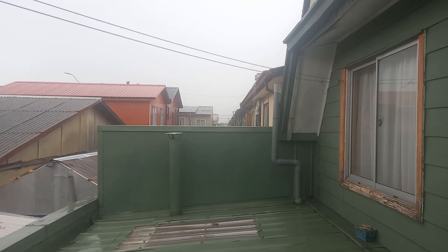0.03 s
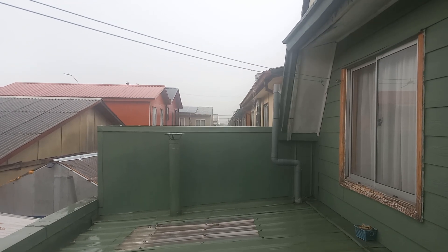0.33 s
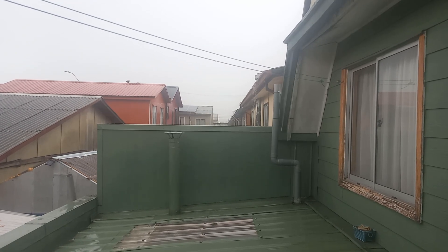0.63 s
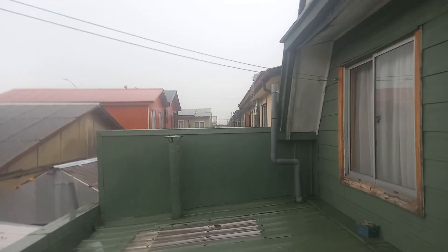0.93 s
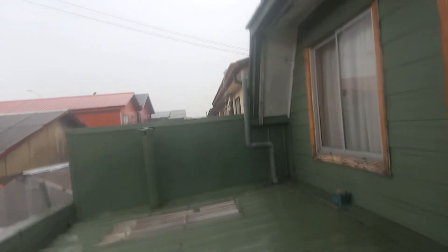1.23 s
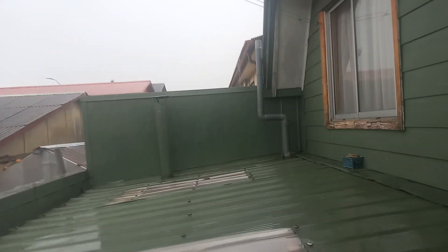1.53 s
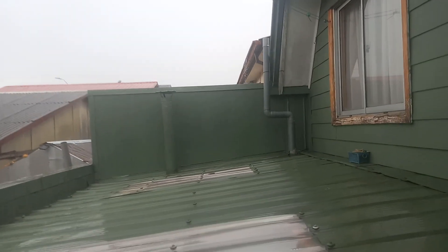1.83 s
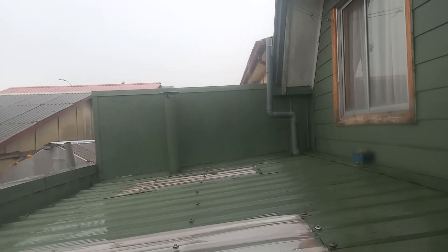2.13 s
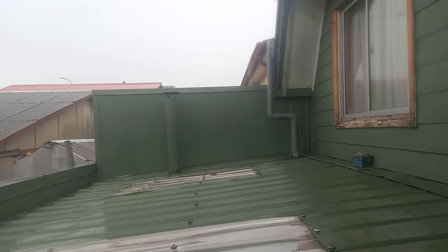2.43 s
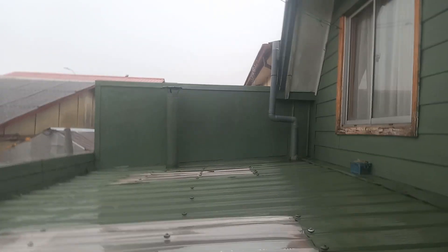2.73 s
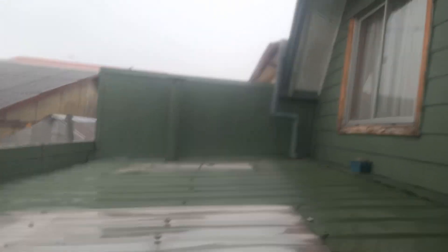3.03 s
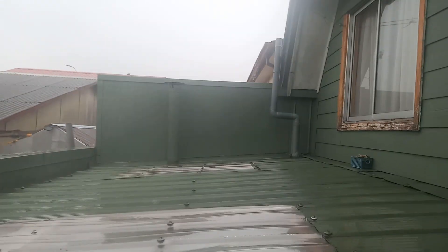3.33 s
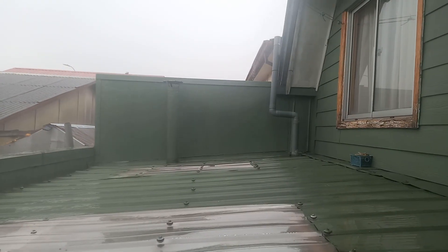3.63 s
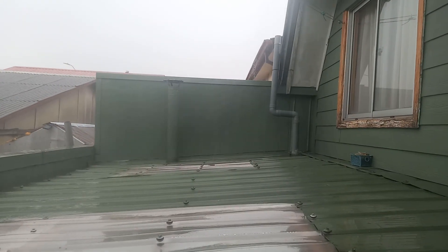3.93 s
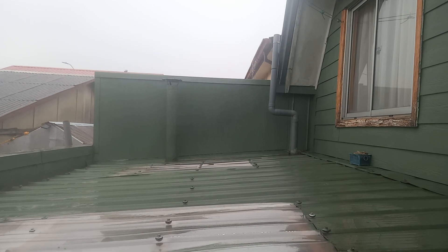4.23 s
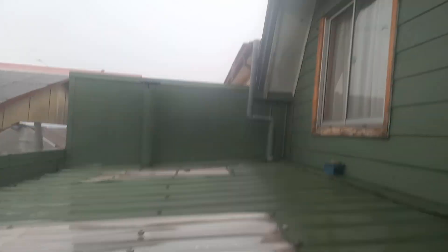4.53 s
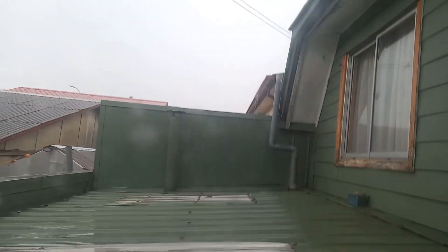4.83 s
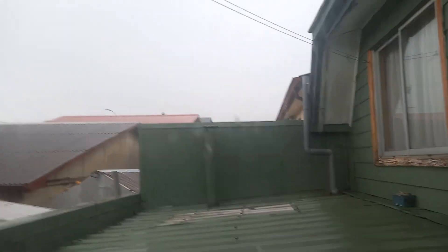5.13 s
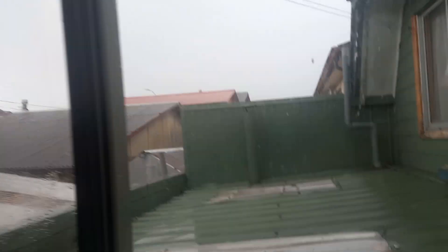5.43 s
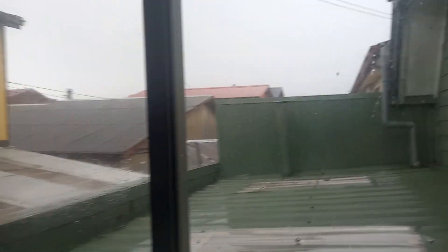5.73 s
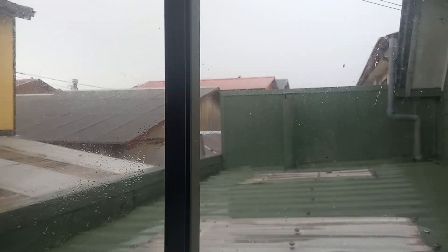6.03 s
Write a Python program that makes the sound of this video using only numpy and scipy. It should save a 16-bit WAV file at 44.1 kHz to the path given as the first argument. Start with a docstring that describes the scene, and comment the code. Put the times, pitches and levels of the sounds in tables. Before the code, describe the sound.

Fingers bump, rub and tick on a handheld microphone over faint rain on sheet-metal roofs, which turns muffled near the end.

```python
"""Rain on metal roofs

Soft, steady rain drums and splashes on sheet-metal roofs, heard from a window by a handheld camera.
Fingers shift their grip: they knock on the case, make it creak and tick, and rub past the two
microphone openings (the ports). A sleeve brushes by. Near the end the camera draws back behind
the window pane, which shuts out much of the bright splash."""
import sys
import numpy as np
from scipy import signal
from scipy.fft import rfft, irfft, next_fast_len
from scipy.io import wavfile

SR = 44100
rng = np.random.default_rng(int(sys.argv[2]) if len(sys.argv) > 2 else 0)


def log_audio(samples):
    """Write samples as a 16-bit WAV file to the path given in sys.argv[1]."""
    # one column per channel
    frames = np.atleast_2d(samples).T
    # limit to full scale, then quantise
    limited = np.clip(frames, -1, 1)
    pcm = np.round(limited * 32767).astype(np.int16)
    wavfile.write(sys.argv[1], SR, pcm)


N = 276507
TIME = np.arange(N) / SR
AGE = TIME[:SR // 4]   # seconds since a touch

# How hard it rains. Each row: time in seconds, level in dB, extra roof drumming in dB.
RAIN_LEVELS = [(0, -57.7, -5), (0.5, -55.3, -2), (0.9, -52, -0.5), (1.5, -54, 3), (1.9, -53.5, -3),
               (2.15, -59.5, 1.5), (2.45, -58, 3.5), (2.8, -52, 1.5), (3.45, -54.5, 2), (4.55, -54.5, 3.8)]
# The tone of the rain. Each row: frequency in Hz, level in dB.
RAIN_TONE = [(50, -7), (82, 1), (125, 0), (175, -10.5), (280, -6), (400, -4.5), (640, -6), (1050, -10),
             (1700, 0), (2300, -2.5), (3000, -17), (4000, -17), (5000, -20), (6200, -17)]
# How the glass weakens the splash. Each row: change in dB, first left, then right.
PANE_SPLASH_DB = [
    [-13],
    [-17.5],
]


def rain():
    """Far drops blur into a wash; near ones add fine grain. The pane dims the treble first and most."""
    level_db, extra_drum_db = in_time(RAIN_LEVELS)
    retreat_start_s, retreat_takes_s = 4.64, 0.82
    retreat = (TIME - retreat_start_s) / retreat_takes_s
    behind_pane = np.clip(retreat, 0, 1)
    drum_db = level_db + extra_drum_db - 13 * behind_pane
    patter_db = level_db - 9.4 * behind_pane
    splash_db = level_db + PANE_SPLASH_DB * np.clip(retreat + 0.21, 0, 1)
    drops = rng.standard_normal((2, N)) + from_db(-3) * grains(per_s=2900, spread_db=2.0)
    wash = with_tone(drops, RAIN_TONE)
    boom = rms_one(cut(wash, 200, "low", order=4)) * from_db(-58.5 + 0.33 * (drum_db + 50))
    drum = rms_one(cut(wash, [200, 950], "band", order=4)) * from_db(drum_db - 1.27)
    patter = rms_one(cut(wash, [950, 2500], "band", order=5)) * from_db(patter_db + 0.84)
    treble = cut(cut(wash, 2690, "high", order=5), 6440, "low", order=18)
    splash = rms_one(treble) * from_db(splash_db - 1.3)
    # the wall beside the window throws the rain back from the right
    return (boom + drum + patter + splash) * from_db([[-1.8], [1.4]])


# Fingers landing on the case. Each row: start in seconds, knock level in dB, pitch in Hz,
# crack level in dB, side in dB (above zero is left, below zero is right).
FINGER_KNOCKS = [(0.3105, -25, 6000, -35, -20), (0.5056, -19, 570, -36, -26),
                 (0.8517, -10.5, 5440, -21, -20), (1.1006, -1.5, 473, -9, -11), (1.1025, 6, 147, -18, -36),
                 (1.179, -6, 378, -12, -15), (1.1828, -2.5, 980, -7.5, -29), (1.1936, 8, 440, -5, 38),
                 (1.2059, -2, 4500, -4, 4), (1.2326, -4, 600, -15, 30), (1.3235, 4.5, 434, -15, 40),
                 (1.381, -11, 320, -26, 26), (1.398, -9, 656, -17, 37), (1.426, -9.5, 350, -22, 26),
                 (1.4588, 6, 408, -12.5, 21), (1.57, -6, 500, -15.5, 13), (1.842, -16, 192, -34, -2),
                 (3.0303, -8, 730, -25, -15), (3.1006, 10.5, 500, -3, 13), (4.4219, -13.5, 317, -19, -21),
                 (4.461, -7.5, 480, -15, -29), (4.5086, -6, 387, -40, -32), (4.5292, -0.5, 347, -25, -38),
                 (5.7469, -19.5, 323, -38, 24), (6.033, -40, 1170, -31, 22)]
# The low notes of the case. Each row: pitch in Hz, level in dB, seconds to fade by 60 dB.
CASE_NOTES = [(81, -3.5, 0.15), (121.8, -4.5, 0.072), (211, -10, 0.051), (297, -9.5, 0.042)]


def knocks():
    """A fingertip lands near one port: a push of air, a hollow knock, a crack and a low thump."""
    out = np.zeros((2, N))
    for start, knock_db, hz, crack_db, left_db in FINGER_KNOCKS:
        # soft flesh rounds off the push
        press = cut(air_push(hz, cycles=2.28), min(4.07 * hz, 14000), "low", order=3)
        hollow = cut(rng.standard_normal(len(AGE)), [170, 600], "band") * fade(0.081)
        note = ring(hz=252.3, fade_s=0.082)
        blow = from_db(knock_db) * (press + from_db(-11) * hollow + from_db(-27.5) * note)
        edge = from_db(crack_db) * crack(grit_db=-16, grit_fade_s=0.013)
        # lower, fleshier knocks thump the case more
        thump_db = knock_db - 22 - 9.5 * np.log2(hz / 444)
        thump = from_db(thump_db) * strike(CASE_NOTES, spread_db=0)
        add(out, start, at_ports(blow + edge + thump, left_db))
    return through_port(out)


# The hard ring of the shell. Each row: pitch in Hz, level in dB, seconds to fade by 60 dB.
SHELL_NOTES = [(2070, -12.5, 0.0023), (3660, -5.5, 0.0018), (5000, -5.5, 0.0016), (13180, -2.5, 0.00075)]


def crack(grit_db, grit_fade_s):
    """The hard edge of a touch rings the shell and leaves a short, gritty tail."""
    grit = cut(rng.standard_normal(len(AGE)), 1600, "high", order=1) * fade(grit_fade_s)
    return strike(SHELL_NOTES, spread_db=1.0) + from_db(grit_db) * grit


# Creaks of the case. Each row: start in seconds, number of slips, gap in seconds, level in dB,
# pitch in Hz.
SEAM_CREAKS = [(1.8598, 1, 0, -8.5, 740), (1.8798, 5, .0072, -6.5, 780), (1.9239, 2, .0062, -8.5, 690),
               (1.9504, 1, 0, -5, 700), (1.9703, 2, .0063, -7.5, 805), (1.9936, 1, 0, -8, 720),
               (2.0243, 1, 0, -7, 1170), (2.19, 1, 0, -9.5, 1340), (2.3988, 1, 0, -11.5, 1380),
               (2.4955, 1, 0, -11.5, 1280), (2.5263, 1, 0, -12.5, 1300), (2.593, 4, .0143, -12, 1080),
               (2.8177, 1, 0, -19, 1650), (4.9917, 1, 0, -10.5, 1680), (4.9928, 1, 0, -10, 520)]


def seam_slips():
    """A seam gives under the grip, once or in a run of ever weaker slips. Yields start, level, pitch."""
    for start, count, gap_s, db, hz in SEAM_CREAKS:
        for k in range(round(count)):
            detune = np.exp(min(k, 1) * 0.06 * rng.standard_normal())   # the first slip stays in tune
            yield start + k * gap_s, db - 1.8 * k, hz * detune


# Quick, high slips crack harder than slow, dull ones. Each row: pitch in Hz, crack level in dB.
CRACK_BY_PITCH = [(700, -27), (1050, -19), (1650, -18.5)]


def seam_ticks():
    """Each slip snaps beside the right port; the left one hears a duller ring a moment later."""
    out = np.zeros((2, N))
    for start, db, hz in seam_slips():
        crack_db = at_hz(CRACK_BY_PITCH, hz)
        slip = cut(air_push(hz, cycles=2.94), min(3.22 * hz, 6500), "low", order=4)
        edge = cut(crack(grit_db=-18, grit_fade_s=0.017), 7700, "low")
        add(out, start, pan(left_db=-19.5) * (from_db(db) * slip + from_db(crack_db) * edge))
        # only the low part travels through the case, best near 750 Hz
        far = cut(cut(air_push(hz, cycles=3.6), 1900, "low", order=5), 380, "high")
        far_db = db - 6.5 - 11 * abs(np.log2(hz / 750))
        add(out, start + 0.00062, pan(left_db=43) * from_db(far_db) * far)
    return through_port(cut(out, 110, "high"))


# Skin sliding over the case. Each row: peak time, swell and fade in seconds, level in dB, side in dB.
SKIN_STROKES = [(0.595, .04, 0.11, -69, -3), (0.875, .03, 0.087, -58.5, -10), (1.03, 0.1, 0.23, -55.5, -21),
                (1.103, .02, 0.017, -35, -27), (1.135, .07, .05, -59, 3), (1.225, 0.033, .06, -45, -0.5),
                (1.33, .02, .05, -51.5, 5), (1.385, .04, .03, -47.5, 12), (1.575, .12, .09, -42.5, 23),
                (1.63, .1, .1, -57, 0), (1.71, 0.15, .12, -47, 20), (1.88, .1, .15, -58.5, -9),
                (2.85, 0.15, 0.12, -57.5, -18), (3.06, .1, .08, -55, -9), (4.375, .045, .1, -58.5, -24),
                (4.43, .09, .12, -70, -8), (4.478, .028, 0.028, -51, -28), (4.538, .016, 0.028, -43, -30),
                (4.995, .01, .04, -61, -24), (5.815, .05, .025, -67, 25), (6.125, 0.21, 0.13, -65, 25),
                (6.27, 0.17, .1, -59, 28)]
# The tone of sliding skin. Each row: frequency in Hz, level in dB.
SKIN_TONE = [(250, 20), (550, 12.5), (1300, 0.5), (2000, 7), (4000, 7), (6000, 9), (7600, -11), (9500, -4),
             (12000, 1), (16000, -5.5)]


def skin_rub():
    """Skin catches and slips in fine grains, and each port hears its own."""
    pressure = stroke_pressure(SKIN_STROKES) * from_db(2.6 * drift(hz=55))
    fine_slips = with_tone(grains(per_s=14000, spread_db=4.5), SKIN_TONE)
    hiss = rms_one(cut(fine_slips, 300, "high")) * from_db(8)
    # now and then the skin holds longer and lets go with a coarse scrape
    scrape = rms_one(cut(grains(per_s=320, spread_db=2.5), [380, 1300], "band")) * from_db(6)
    return pressure * (hiss + scrape)


# The hand tightening. Each row: start in seconds, seconds held, level in dB, side in dB.
GRIP_SQUEEZES = [(0.605, 0.062, -37, 0), (0.87, .19, -40, -5), (1.13, .13, -30, 5), (1.33, 0.047, -31, 9),
                 (1.45, .13, -29, 6), (1.58, .16, -35, 8), (1.835, .11, -25.5, -2), (1.98, .04, -37, -4),
                 (2.82, 0.046, -45, -3), (3.04, .12, -40, -4), (4.36, 0.18, -43, -6), (5.8, .02, -53, 6),
                 (6.04, 0.045, -54, 10)]
# The tone of the rumble. Each row: frequency in Hz, level in dB.
RUMBLE_TONE = [(30, -43.5), (50, -4.5), (78, 9), (115, -8), (160, -2), (280, -6.5), (450, -11),
               (900, -52.5)]


def grip_rumble():
    """The case rumbles with each squeeze, which comes on quickly, is held and dies away."""
    attack_s, fade_s = 0.02, 0.33
    power = np.zeros((2, N))
    for start, held_s, db, left_db in GRIP_SQUEEZES:
        attack = np.clip((TIME - start) / attack_s, 0, 1)
        release = np.clip((TIME - start - held_s) / fade_s, 0, 2)
        power += (pan(left_db) * attack * from_db(db - 60 * release)) ** 2
    rumble = rms_one(with_tone(rng.standard_normal((2, N)), RUMBLE_TONE)) * from_db(-6.5)
    return np.sqrt(power) * rumble


# Low thumps of the case. Each row: start in seconds, level in dB, side in dB.
CASE_THUMPS = [(0.627, -23.5, -2), (0.642, -24.5, 1.5), (0.9, -29.5, 0), (1.077, -13, -34),
               (1.233, -12, 30), (1.328, -13, 30), (1.398, -12.5, 30), (1.969, -20, -16),
               (3.1038, -15, -25), (4.4399, -23, -27), (5.7466, -29, 25)]


def case_thumps():
    """The low notes of the case ring briefly, alone or under a finger knock."""
    out = np.zeros((2, N))
    for start, db, left_db in CASE_THUMPS:
        add(out, start, pan(left_db) * from_db(db) * strike(CASE_NOTES, spread_db=0.4))
    return out


# A sleeve passing. Each row: peak time, swell and fade in seconds, level in dB, side in dB.
SLEEVE_STROKES = [(0.61, .05, .2, -52, -1), (0.89, .06, .35, -50, -3), (1.49, .06, .16, -46, 4),
                  (4.44, .16, .22, -47, -4), (5.815, .05, .04, -58, 10)]
# The tone of cloth, duller than skin. Each row: frequency in Hz, level in dB.
SLEEVE_TONE = [(150, -20), (400, 0), (900, -1), (1400, -8), (2900, -5), (4500, -9), (6300, -11),
               (7400, -40)]


def sleeve_brush():
    """Cloth slides past in a dense, soft rustle."""
    rustle = with_tone(grains(per_s=9000, spread_db=3.5), SLEEVE_TONE)
    return stroke_pressure(SLEEVE_STROKES) * rms_one(rustle)


def wall_echo(x):
    """Nearby walls send back a short, blurred echo."""
    echo = from_db(-41.5) * rng.standard_normal((2, len(AGE))) * fade(0.18)
    return signal.fftconvolve(x, echo, axes=-1)[:, :N]


def microphone_hiss():
    """The microphones add a faint, high hiss of their own."""
    return from_db(-81) * cut(rng.standard_normal((2, N)), 9500, "high", order=3)


# How a port shapes the treble, with a dip near 8000 Hz. Each row: frequency in Hz, change in dB.
PORT_TONE = [(6300, 0.5), (7000, -2.5), (7600, -15.5), (9000, -15.5), (12000, -8.5), (16000, -8)]


def through_port(x):
    """The port colours a touch without ringing ahead of it (a minimum-phase filter)."""
    size = 512
    gain = from_db(at_hz(PORT_TONE, np.fft.rfftfreq(size, 1 / SR)))
    cepstrum = irfft(np.log(gain))
    # move all of the response to after the touch
    cepstrum[1:size // 2] *= 2
    cepstrum[size // 2 + 1:] = 0
    response = irfft(np.exp(rfft(cepstrum)))
    return signal.fftconvolve(x, response[None], axes=-1)[:, :N]


# How alike left and right sound. Each row: frequency in Hz, likeness (1 is the same, 0 is unrelated).
STEREO_LIKENESS = [(60, 0.65), (130, 0.89), (290, 0.77), (640, 0.1), (1410, -0.21), (3100, 0.058),
                   (7000, -0.11)]


def with_tone(pair, tone):
    """Two unrelated noises become left and right, alike in the bass, with the given tone."""
    size = next_fast_len(N)
    hz = np.fft.rfftfreq(size, 1 / SR)
    alike = np.clip(at_hz(STEREO_LIKENESS, hz), -1, 1)
    mid, side = rfft(pair, size) * from_db(at_hz(tone, hz))
    left_right = np.sqrt(1 + alike) * mid + np.sqrt(1 - alike) * side * [[1], [-1]]
    return irfft(left_right, size)[:, :N]


def stroke_pressure(strokes):
    """Each stroke swells to its peak and fades, louder at the port that it passes."""
    edge_db = -19.5   # one swell before the peak, or one fade after it
    power = np.zeros((2, N))
    for peak_s, swell_s, fade_s, db, left_db in strokes:
        away = np.maximum((peak_s - TIME) / swell_s, (TIME - peak_s) / fade_s)
        near = away < 4
        power[:, near] += (pan(left_db) * from_db(db + edge_db * away[near])) ** 2
    return np.sqrt(power)


def air_push(hz, cycles):
    """A touch presses on the air in the port: a swing or two that swell and die at once."""
    swing = ring(hz, cycles / hz) * (1 - np.exp(-4 * hz * AGE))
    return np.gradient(swing) * SR / (2 * np.pi * hz)


def strike(notes, spread_db):
    """A hit rings all the notes, each varied by spread_db; neighbours swing in opposite directions."""
    chance_db = rng.normal(0, spread_db, len(notes))
    return sum((-1) ** k * from_db(db + chance_db[k]) * ring(hz, fade_s)
               for k, (hz, db, fade_s) in enumerate(notes))


def ring(hz, fade_s):
    """One struck note dying away."""
    return np.sin(2 * np.pi * hz * AGE) * fade(fade_s)


def fade(seconds):
    """Falls by 60 dB in the given time."""
    return from_db(-60 * AGE / seconds)


def grains(per_s, spread_db):
    """Two unrelated streams of tiny impacts, many small and a few large."""
    sizes = from_db(spread_db * np.minimum(rng.exponential(1, (2, N)), 5))
    hits = rng.random((2, N)) < per_s / SR
    return rms_one(hits * sizes * rng.choice([-1, 1], (2, N)))


def drift(hz):
    """A smooth random wobble, about 1 in size."""
    step, warm_up = 40, 2000
    pole = np.exp(-2 * np.pi * hz * step / SR)
    noise = rng.standard_normal(N // step + warm_up + 2)
    slow = signal.lfilter([1], [1, -2 * pole, pole * pole], noise)[warm_up:]
    return np.interp(np.arange(N) / step, np.arange(len(slow)), rms_one(slow))


def at_ports(sound, left_db, lag_s=0.00028):
    """The far port hears a touch weaker and later."""
    late = np.pad(sound, (round(lag_s * SR), 0))[:len(sound)]
    return pan(left_db) * np.array([sound, late] if left_db > 0 else [late, sound])


def pan(left_db):
    """The nearer port gets the whole sound, the other one less."""
    return from_db([[min(left_db, 0)], [min(-left_db, 0)]])


def add(out, start, sound):
    """Mix a sound in at its start, in seconds."""
    i = round(start * SR)
    out[:, i:i + sound.shape[-1]] += sound[..., :N - i]


def cut(x, hz, keep, order=2):
    """Keep the lows, the highs or a band; a higher order cuts more sharply."""
    return signal.sosfilt(signal.butter(order, hz, keep, fs=SR, output="sos"), x)


def in_time(rows):
    """Turn timed rows into one curve for each column."""
    seconds, *columns = np.transpose(rows)
    return [np.interp(TIME, seconds, column) for column in columns]


def at_hz(rows, hz):
    """Read a table at any frequency, gliding evenly by octaves."""
    row_hz, values = np.transpose(rows)
    return np.interp(np.log(np.maximum(hz, 1)), np.log(row_hz), values)


def from_db(db):
    """Turn decibels into a multiplier."""
    return 10 ** (np.asarray(db) / 20)


def rms_one(x):
    """Scale to an average strength (rms) of 1."""
    return x / np.sqrt(np.mean(x ** 2) + 1e-20)


def scene():
    """Rain outside, a hand on the case, and the faint hiss of the microphones."""
    ticks = seam_ticks()
    hiss = microphone_hiss()
    outside = rain()
    hand = skin_rub() + grip_rumble() + sleeve_brush() + knocks() + case_thumps()
    return outside + hand + ticks + wall_echo(ticks) + hiss


def record(dry):
    """The deepest bass is shut out, the hardest knocks overload, and the highest treble is cut."""
    overloaded = np.clip(cut(dry, 58, "high", order=4), -0.86, 0.86)
    return cut(overloaded, 16000, "low", order=40)


dry = scene()
out = record(dry)
log_audio(out)
```